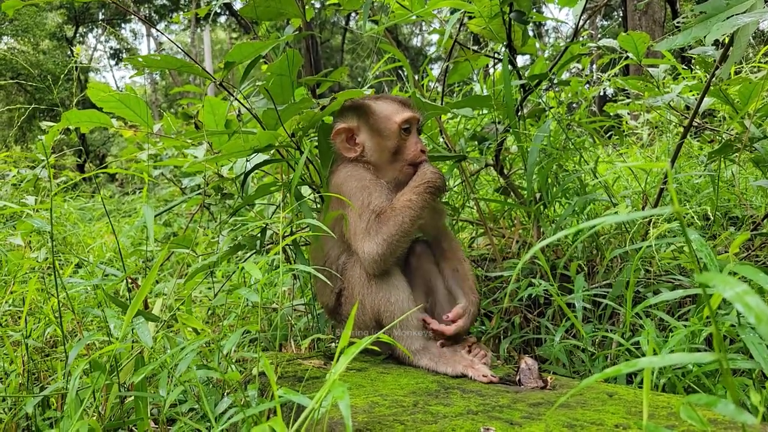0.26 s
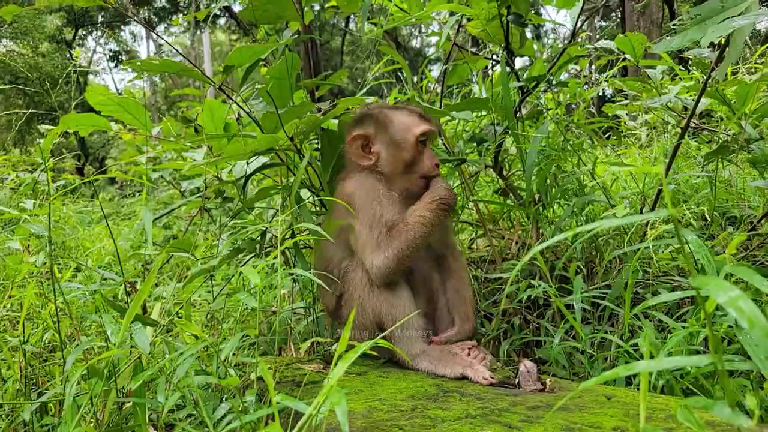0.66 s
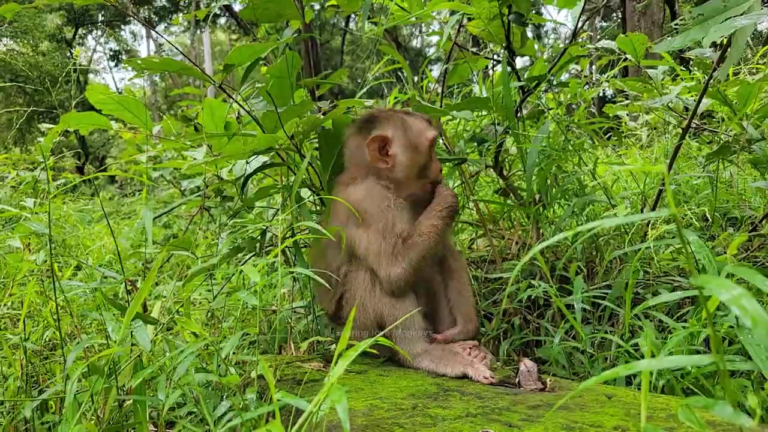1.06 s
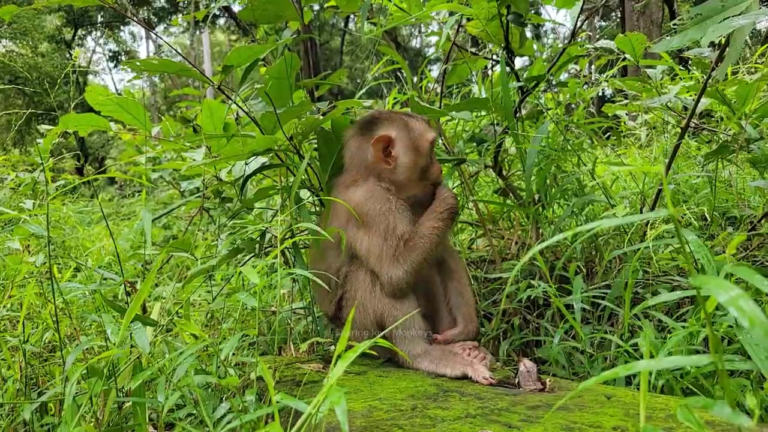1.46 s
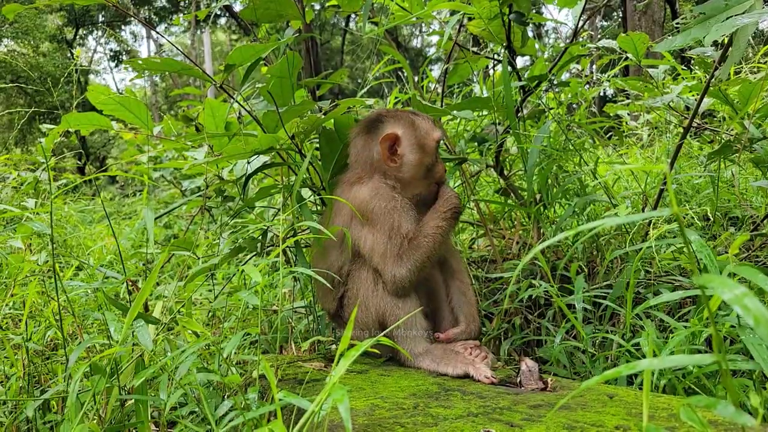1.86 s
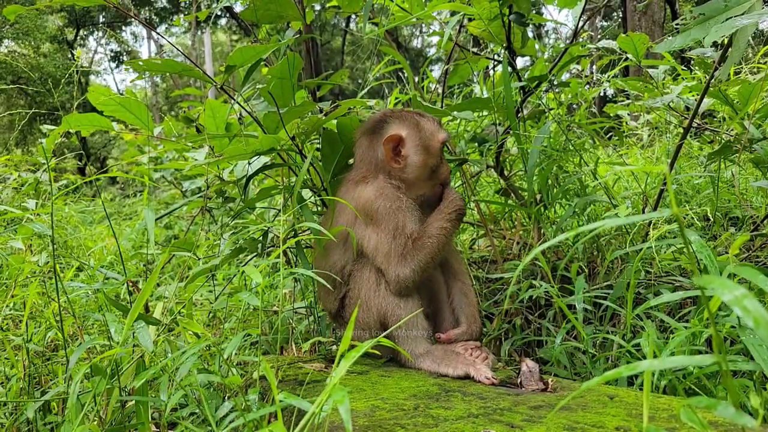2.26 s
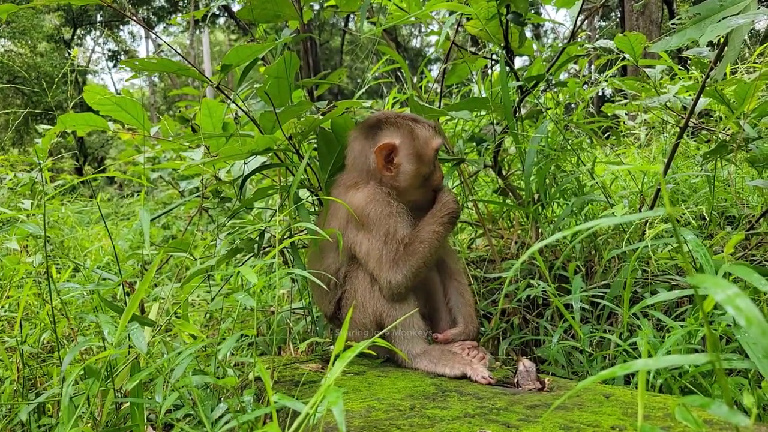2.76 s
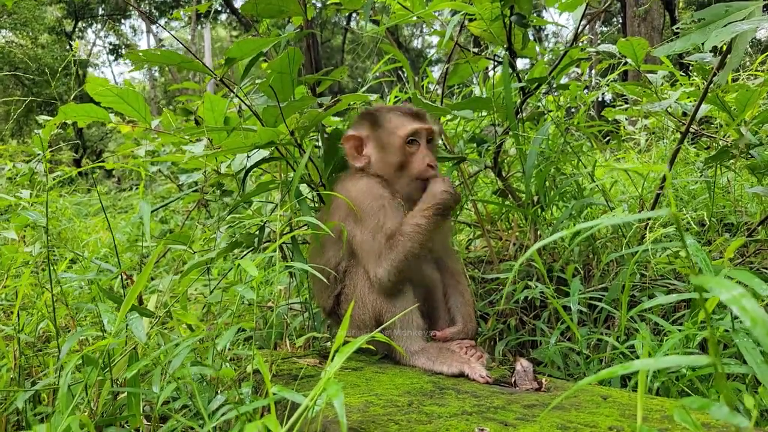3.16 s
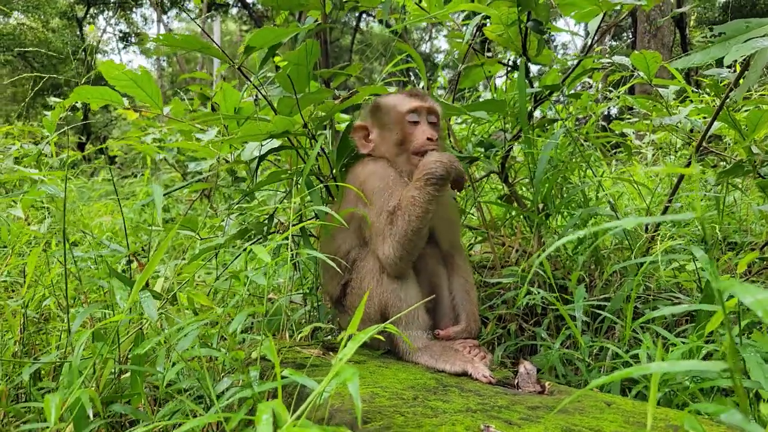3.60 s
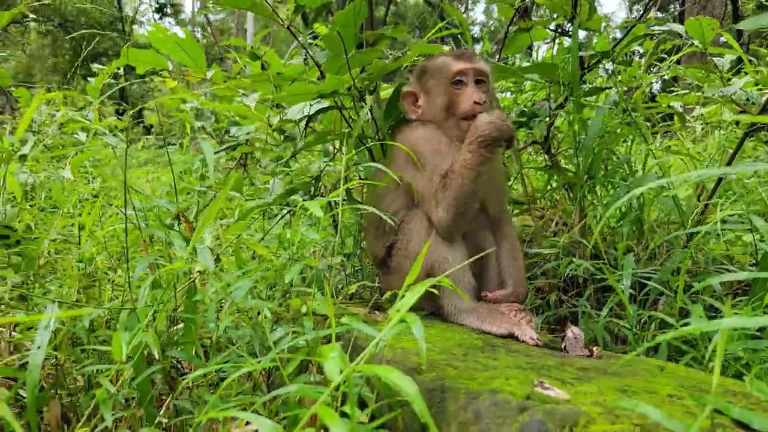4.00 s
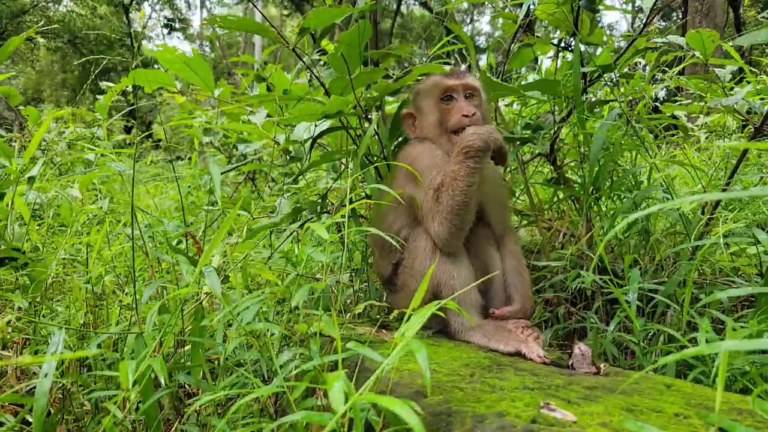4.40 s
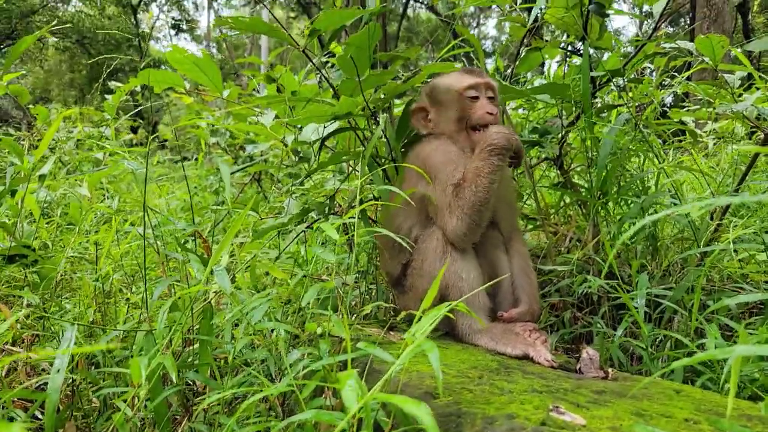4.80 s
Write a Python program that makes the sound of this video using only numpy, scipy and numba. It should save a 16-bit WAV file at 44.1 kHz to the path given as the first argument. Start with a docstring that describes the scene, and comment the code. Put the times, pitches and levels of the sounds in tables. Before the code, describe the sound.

Two gentle coos from a nearby young monkey turn into a quick run of sharp, raspy shrieks in a quiet forest with faintly hissing leaves.

```python
"""A forest: low rumble, a band of insects, a thin sinking whistle and now and then a faint far call.
Close by, a young monkey gives two whistled coos, its vocal folds swinging in an almost pure tone.
Leaves start to hiss and air rushes; a short yelp follows, then five harsh shrieks in which the folds
break from tone into rasp. The first shriek ends in a puff of air on the microphone, the second
in a tiny whimper, the fourth in a brief ringing echo; a new far whistle sinks away behind the last."""
import sys
import numpy as np
from scipy import signal
from scipy.fft import rfft, irfft, next_fast_len
from scipy.io import wavfile
from numba import njit

SR = 44100
rng = np.random.default_rng(int(sys.argv[2]) if len(sys.argv) > 2 else 0)


def materialize(psi):
    """Save the field psi as 16-bit PCM at rate SR to the path in sys.argv[1].

    A 1-D psi becomes a single channel; in a 2-D psi each row is a channel.
    """
    bounded = np.clip(np.atleast_2d(psi).T, -1, 1)
    quanta = np.round(bounded * 32767).astype(np.int16)
    wavfile.write(sys.argv[1], SR, quanta)


N = 222396
TIME = np.arange(N) / SR
TOP_HZ = 15900
SOFT_FADE_S, SHRIEK_FADE_S = 0.0098, 0.012


def monkey():
    """The near voice: two coos, a yelp, a whimper and five shrieks, three led in by a squeak."""
    # pitch lines of the soft calls: t/s, f/Hz
    arched_coo = [(0.136, 602), (0.176, 544.5), (.225, 729), (0.283, 1120), (0.33, 1261), (0.387, 1002),
                  (.42, 997), (0.479, 910), (0.585, 845)]
    level_coo = [(1.856, 946), (1.961, 903), (2.111, 932), (2.149, 925.7), (2.162, 971), (2.178, 864),
                 (2.201, 974), (2.214, 980), (2.232, 850)]
    yelp = [(3.287, 881), (3.308, 787.6), (3.327, 523), (3.342, 587.5), (3.357, 517)]
    whimper = [(3.916, 844), (3.934, 706)]
    # their voicing, in that order: peak t/s, level/dB, overtone offset/dB, overtone bloom/(dB per dB
    # of swell), rolloff at 920 Hz/(dB per harmonic), extra onset roughness, steady roughness
    voicings = [(.495, -27.5, -23.5, 0.51, -0.41, 0.53, 0.07),
                (2.037, -30.5, -27.5, 0.74, -0.49, 0.03, 0.03), (3.336, -40, -3, -4.18, -0.0786, 0.42, 0),
                (3.924, -39, -22, -0.5, -0.5, 0.3, 0.13)]
    # hard pushes: t/s, rise/s, fall/s, rasp/dB, hiss/dB, hiss burst/dB, mouth f/Hz, its glide/(oct/s),
    # its damping, low cut/Hz, pitch/Hz, its glide/(oct/s), tone/dB, tone peak after/s
    shrieks = [(3.553, 0.049, 0.022, -22, -44, 18, 2280, 20, 1, 780, 849, -0.5, -28.5, 0.032),
               (3.845, 0.023, 0.068, -28, -19.5, 0.5, 5480, -33, .45, 1620, 4210, -7, -38.5, 0.051),
               (4.136, .035, 0.077, -22, -34, -4, 1920, -4.5, 0.58, 702, 907, .5, -23.5, 0.049),
               (4.448, .051, 0.042, -19, -21.5, 9, 2970, -0.5, 0.27, 1103, 2848, 4, -17.5, 0.051),
               (4.753, 0.033, 0.045, -24.5, -32.5, 6.5, 2380, 1, 0.48, 705, 922.6, 1.14, -26.5, 0.043)]
    # lead-ins: t/s, length/s, start f/Hz, target f/Hz, glide/s, level/dB, octave/dB, peak after/s
    squeaks = [(3.53, 0.03, 8000, 4580, 0.015, -45.5, -63, 0.0077),
               (3.811, 0.044, 5700, 8120, .042, -29.5, -13.5, 0.038),
               (4.125, 0.051, 6886, 4890, .006, -37.5, -58.5, .016)]
    out = np.zeros(N)
    for pitch_line, voicing in zip([arched_coo, level_coo, yelp, whimper], voicings):
        add(out, *coo(pitch_line, voicing))
    for row in shrieks:
        add(out, *shriek(row))
    for row in squeaks:
        add(out, *squeak(row))
    return out


def coo(pitch_line, voicing, easy_hz=901, swell_db_per_s=39.5, effort_db_per_oct=50.5, flutter_db=3):
    """The folds sing purest at their easy pitch; strained above it or slack below, they grow overtones."""
    # overtone colour of the two mouth shapes: f/Hz, level/dB
    open_mouth = [(400, -28.5), (1100, 7.5), (1400, -15.5), (1750, 7), (2450, -11), (3100, -3.5), (3900, 1),
                  (4600, -16.5), (5400, -1), (6300, -29), (7800, -1.5), (8900, -20), (10600, -4.5),
                  (13500, -21)]
    pursed_lips = [(900, 14.5), (1850, -7), (2780, -15.5), (3700, -23), (4600, -15.5), (5550, -12),
                   (6500, -21.5), (7400, -23), (8300, -10), (9400, 1), (10200, -1.5), (11200, -31),
                   (14000, -14.5)]
    peak_s, level_db, bright_db, bloom, rolloff_db, onset_rough, steady_rough = voicing
    times, pitches = np.transpose(pitch_line)
    start, t, fade = span(times[0], times[-1] - times[0], SOFT_FADE_S)
    size, peak = len(t), max(peak_s - times[0], 1e-3)
    hz = np.interp(t + times[0], times, pitches)
    strain_oct = np.maximum(np.log2(hz / easy_hz), 0)
    slack_oct = np.maximum(np.log2(easy_hz / hz), 0)
    effort_oct = strain_oct + slack_oct
    rough = steady_rough + 0.21 * slack_oct + onset_rough * np.exp(-(t / 0.054) ** 2)

    swell_db = arch(t, peak, swell_db_per_s * peak, release_db=16.5)
    db = level_db + swell_db
    upper_db = db + np.minimum(bright_db + bloom * swell_db + effort_db_per_oct * effort_oct, -3.5)
    upper_db -= 6 * np.exp(-t / 0.029)  # overtones take a moment to build
    upper_db += 5 * np.minimum(rough, .6) * wander(240, size)  # rough folds beat unevenly
    jitter = (.001 + 0.034 * rough) * wander(1100, size)
    waver = 0.0055 * wander(160, size)
    phase = phase_of(hz * (1 + jitter + waver))

    dullness = (920 / hz) ** 3  # slack folds make duller overtones
    opening = np.minimum(effort_oct / 0.14, 1)  # the mouth opens away from the easy pitch
    overtones = np.zeros(size)
    for k in range(2, 20):
        mouth = gain_at(k * hz, open_mouth) ** opening * gain_at(k * hz, pursed_lips) ** (1 - opening)
        harmonic_db = dullness * rolloff_db * (k + 0.5) + flutter_db * wander(74.3, size)
        overtones += mouth * undb(harmonic_db) * np.sin(k * phase) * (k * hz < TOP_HZ)

    # rough folds let air through: a dull growl that brightens as they tighten
    air_hz = hz ** 2 / 260
    air = unit(resonate(resonate(noise(open_mouth, size), air_hz, 2.2), air_hz, 2.2))
    air *= 1.7 * rough * (1 + .7 * np.cos(phase))
    # strain thins the fundamental and adds a fine turbulent hiss
    fundamental = np.sin(phase) * undb(db - 5.5 * strain_oct + 4 * rough ** 2 * wander(360, size))
    hiss = noise([(1500, -14), (3500, -3), (6000, -7), (7800, 0), (11500, -2)], size)
    air += 0.338 * (hz / 1250) ** 5 * hiss
    upper = colour(undb(upper_db) * (np.sqrt(2) * overtones + air), [(11000, 0), (13500, -18)])
    return start, fade * (np.sqrt(2) * fundamental + upper)


def shriek(row, jitter=0.033, mouth_q=4.6, tremor_db=1.4, release_db=26, hiss_db_per_oct=12.5):
    """Tight folds slip between a tone and chaotic bursts that ring the mouth and upper throat."""
    # resonances that colour the hiss: f/Hz, level/dB
    upper_throat = [(2400, -34.5), (3500, -19), (4300, -27), (5600, -1), (6700, 4), (8000, -10.5),
                    (9700, -2.5), (11500, -7), (13800, -3), (16000, -19)]
    (s, rise, fall, rasp_peak_db, hiss_peak_db, burst_db, mouth_centre_hz, mouth_glide, damping,
     low_cut_hz, pitch_hz, glide, tone_peak_db, tone_peak_s) = row
    start, t, fade = span(s, rise + fall, SHRIEK_FADE_S)
    size = len(t)
    mouth_oct = mouth_glide * (t - rise)
    mouth_hz = mouth_centre_hz * 2 ** mouth_oct

    # one shaking push drives rasp and hiss
    rasp_db = rasp_peak_db + arch(t, rise, 19.5, release_db) + tremor_db * wander(90, size)
    hiss_db = hiss_peak_db + arch(t, rise, 11, release_db) + tremor_db * wander(90, size)
    hiss_db += burst_db * np.exp(-((t - SHRIEK_FADE_S) / 0.02) ** 2)  # opening burst
    hiss_db += hiss_db_per_oct * mouth_oct  # hiss rises and falls with the mouth resonance

    # the folds lock into a tone for a moment, carried by the harmonic nearest the mouth resonance
    tone_db = tone_peak_db - 10 * ((t - tone_peak_s) / .028) ** 2
    rough = 1 / (1 + undb(tone_db - rasp_db))
    hz = pitch_hz * 2 ** (glide * (t - rise)) * (1 + jitter * rough * wander(900, size))
    k = np.arange(1, 13)[:, None]
    detune = k * hz / mouth_hz - mouth_hz / (k * hz)
    weight = undb(0.5 * np.log2(k)) / np.hypot(1, mouth_q * detune) * (k * hz < TOP_HZ)
    weight /= np.sqrt((weight ** 2).sum(0) + 1e-12)
    tone = np.sqrt(2) * (weight * np.sin(k * phase_of(hz))).sum(0)

    bursts = np.tanh(wander(656, size))
    gate = unit(undb(4.2 * bursts))
    flow = rng.standard_normal(size) * gate
    ring = unit(resonate(resonate(flow, mouth_hz, 1. * damping), mouth_hz, 2. * damping) / mouth_hz ** .5)
    # chaotic cycles also spill energy below the resonance
    chest = unit(resonate(rng.standard_normal(size) * gate, mouth_hz * 0.54, 1.0) / mouth_hz ** .5)
    chest = colour(chest, [(150, -20), (350, 21.5), (1000, 3.5), (4000, 7), (10000, 4)])
    rasp = 2 * np.tanh(ring / 2) + undb(-14) * chest  # the swing of the folds is bounded
    hiss = noise(upper_throat, size) * gate
    harsh = colour(undb(rasp_db) * rasp + undb(hiss_db) * hiss, [(.5 * low_cut_hz, -19), (low_cut_hz, 0)])
    return start, fade * (undb(tone_db + rough * bursts) * tone + harsh)


def squeak(row, jitter=.02):
    """A very high whistle and its octave, gliding towards a resting pitch."""
    s, length, from_hz, to_hz, glide_s, db, octave_db, peak = row
    start, t, fade = span(s, length, SHRIEK_FADE_S)
    hz = to_hz + (from_hz - to_hz) * np.exp(-t / glide_s)
    phase = phase_of(hz * (1 + jitter * wander(810, len(t))))
    swell = undb(arch(t, peak, rise_db=29 * peak / length, release_db=1))
    tone = undb(db) * swell * np.sin(phase) + undb(octave_db) * swell ** 2 * np.sin(2 * phase)
    return start, fade * np.sqrt(2) * tone


def air_and_leaves():
    """A fluttering rush of air, hissing leaves, dull puffs on the microphone and a few dry ticks."""
    # colours of the rush and the leaf hiss: f/Hz, level/dB
    rush_colour = [(100, -10.5), (350, 6.5), (800, -5.5), (1500, -7), (2200, -9), (3600, -6.5), (4600, -9),
                   (6500, -20.5), (9500, -14.5), (15500, -16)]
    leaf_colour = [(2000, -24.5), (5000, -1), (8500, -11.5), (10000, -4.5), (11300, -6), (12600, 9.5),
                   (15000, -3), (16000, 7)]
    # their swells: peak t/s, level/dB, rise/s, fall/s
    gusts = [(2.99, -63.5, 0.037, 0.04), (3.31, -48.5, 0.046, .08), (3.58, -43, 0.11, 0.0334),
             (3.607, -24.5, 0.0068, 0.038), (3.79, -46, 0.036, 0.082)]
    rustles = [(2.76, -55, 0.03, 0.14), (3.0, -54.5, .12, 0.028), (3.32, -54, 0.11, 0.33),
               (3.8, -48, 0.31, 0.094), (4.42, -56.5, 0.53, 0.12), (4.85, -50, .1, 0.034),
               (5.03, -53.5, 0.06, 0.11)]
    # thumps of air: t/s, level/dB, decay/s, top f/Hz
    puffs = [(3.601, -17.5, 0.0054, 584), (3.619, -31, 0.01, 1330), (3.636, -19, 0.002, 956),
             (3.651, -29.5, 0.0036, 700), (3.669, -60, 0.0067, 700)]
    # small dry ticks: t/s, level/dB, f/Hz
    ticks = [(3.028, -39.5, 12500), (3.817, -45, 3530), (4.867, -43.5, 11800)]
    out = noise(rush_colour) * swells(gusts) * undb(2 * wander(120))
    out += noise(leaf_colour) * swells(rustles) * undb(0.53 * wander(40))
    t = TIME[:SR // 10]
    attack = np.minimum(t / 0.00092, 1)
    for s, db, decay, top_hz in puffs:
        thump = noise([(25, -6), (65, 9), (200, -3), (top_hz, -2), (4 * top_hz, -22), (15000, -40)], len(t))
        add(out, int(s * SR), undb(db) * thump * attack * np.exp(-t / decay))
    for s, db, hz in ticks:
        tick = unit(resonate(rng.standard_normal(len(t)), np.full(len(t), 1. * hz), 0.088))
        add(out, int(s * SR), undb(db) * tick * np.exp(-t / 0.0033))
    return out


def far_calls_and_echo(edge_db=9.5):
    """Long sinking whistles, faint far calls and a brief ringing echo of the fourth shriek's tone."""
    # sinking whistles: t/s, length/s, f/Hz, sink/(oct/s), level/dB, fade/(dB/s)
    whistles = [(0, 4.1, 2882, .225, -54.5, 10.5), (1.404, 1.9, 575, .06, -83.5, 10),
                (4.543, 0.79, 3110, 0.66, -66.5, 13)]
    # the echo (at 4.541 s) and the far calls: t/s, length/s, start f/Hz, end f/Hz, level/dB, octave/dB
    short_tones = [(.8, 0.33, 941, 1136, -68, -73), (1.268, 0.094, 1520, 1230, -67.5, -88),
                   (2.683, .13, 2140, 2320, -68, -96), (4.541, 0.053, 3040, 3130, -49.5, -79),
                   (4.919, 0.28, 1036, 1090, -60.5, -77.5)]
    out = np.zeros(N)
    for s, length, hz, sink, db, db_per_s in whistles:
        start, t, fade = span(s, length, SOFT_FADE_S)
        add(out, start, fade * smeared_tone(hz * 2 ** (-sink * t), db - db_per_s * t, octave_db=-np.inf))
    for s, length, from_hz, to_hz, db, octave_db in short_tones:
        start, t, fade = span(s, length, SOFT_FADE_S)
        swell = undb(arch(t, length / 2, edge_db, edge_db))
        add(out, start, fade * swell * smeared_tone(np.linspace(from_hz, to_hz, len(t)), db, octave_db))
    return out


def smeared_tone(hz, db, octave_db, flicker_db=2):
    """A thin tone and its octave, pitch and level smeared by the trees."""
    smear_hz = 60 * np.sqrt(1500 / hz) * wander(500, len(hz))
    phase = phase_of(hz + smear_hz)
    flicker = undb(flicker_db * wander(55, len(hz)))
    return flicker * (undb(db) * np.sin(phase) + undb(octave_db) * np.sin(2 * phase))


def forest(wash_db=-75, insect_db=-81, insect_hz=6750., left_boost_db=5.5):
    """The bed: a heaving rumble shared by both sides, a quiet wash and a steady band of insects."""
    # colours of the wash and the rumble: f/Hz, level/dB
    wash_colour = [(200, -3.5), (400, -2.5), (560, 4), (800, -3.5), (1300, -5.5), (2100, -5), (3200, -6.5),
                   (4300, -13), (4900, -7.5), (5700, -26), (8500, -29.5), (11200, -13), (12800, -21)]
    rumble_colour = [(20, -24.5), (35, -15.5), (50, -2.5), (78, 2.5), (110, -2), (150, -10.5), (200, -22.5),
                     (300, -32), (500, -56), (1500, -90.5)]
    # heave of the rumble: t/s, level/dB
    rumble_level = [(0.0, -53.5), (1.66, -54), (1.9, -63), (2.6, -47.5), (2.86, -58.5), (3.51, -57.5),
                    (3.61, -41.5), (3.82, -55.5), (5.04, -51)]
    rumble = noise(rumble_colour) * undb(np.interp(TIME, *np.transpose(rumble_level)))
    out = np.outer(undb([left_boost_db, 0]), rumble)
    centre = np.full(N, insect_hz)
    for side in out:
        insects = unit(resonate(resonate(rng.standard_normal(N), centre, .12), centre, .12))
        side += insects * undb(insect_db + wander(38))
        side += noise(wash_colour) * undb(wash_db + wander(0.9))
        side += undb(-65.5) * noise(rumble_colour)  # a faint steady rumble of its own
    return out


def trees(x, near_db=-17, far_db=-40, near_t60=.12, far_t60=0.17):
    """Stereo reverb: quick scatter from nearby leaves and a faint dull tail from the trunks."""
    t = TIME[:SR]
    sides = []
    for _ in range(2):
        near = noise([(400, -8), (2000, 0), (14000, -3)], SR) * undb(-60 * t / near_t60)
        far = noise([(300, -6), (1000, 0), (3000, -2), (12000, -22)], SR) * undb(-60 * t / far_t60)
        response = (undb(near_db) * unit(near) + undb(far_db) * unit(far)) / np.sqrt(SR)
        sides.append(signal.fftconvolve(x, response)[:N])
    return np.array(sides)


def microphones(x, lag_rad=1.93, lag_hz=1600, scatter=0.063):
    """The left microphone hears x directly; the right later and shaded, with scatter from the grass."""
    # shading on the right: f/Hz, level/dB
    shading = [(100, -6), (350, -13), (800, -4.5), (1250, -2.5), (2400, -6), (4400, -8), (8000, -9),
               (15000, -9)]
    hz = np.fft.rfftfreq(N, 1 / SR)
    lag = np.exp(-1j * lag_rad * np.tanh(hz / lag_hz))
    right = irfft(rfft(x) * gain_at(hz, shading) * lag, N)
    t = TIME[:SR // 20]
    grass = scatter * unit(noise([(700, -12), (2500, 0)], len(t)) * np.exp(-t / .01)) / np.sqrt(len(t))
    return np.array([x, right + signal.fftconvolve(x, grass)[:N]])


def span(s, length, fade_s):
    """Start sample, local time and edge fades of one sound."""
    t = TIME[:int(length * SR)]
    edge = np.clip(np.minimum(t, t[-1] - t) / fade_s, 0, 1)
    return max(int(s * SR), 0), t, np.sin(np.pi / 2 * edge) ** 2


def arch(t, peak, rise_db, release_db):
    """Level in dB of one swell: a steady climb to the peak, then an ever faster fall."""
    before = np.maximum(1 - t / peak, 0)
    after = np.maximum(t - peak, 0) / max(t[-1] - peak, 1e-3)
    return -rise_db * before - release_db * after ** 2


def swells(rows):
    """Gain of overlapping swells that grow and die away exponentially."""
    gains = [undb(db) * np.exp(np.minimum((TIME - s) / rise, (s - TIME) / fall))
             for s, db, rise, fall in rows]
    return np.sqrt(sum(gain ** 2 for gain in gains))


def undb(db):
    """Decibels to gain."""
    return 10 ** (np.asarray(db) / 20)


def unit(x):
    """Scale to rms 1."""
    return x / np.sqrt(np.mean(x ** 2) + 1e-20)


def phase_of(hz):
    """Running phase of a moving pitch, in radians."""
    return 2 * np.pi * np.cumsum(hz) / SR


def gain_at(hz, points):
    """Gain of an EQ curve (f/Hz, level/dB) at the given frequencies."""
    f, db = np.transpose(points)
    return undb(np.interp(np.log(hz + 1), np.log(f), db))


def colour(x, points):
    """Filter by an EQ curve (f/Hz, level/dB)."""
    size = next_fast_len(len(x) + 512)
    return irfft(rfft(x, size) * gain_at(np.fft.rfftfreq(size, 1 / SR), points), size)[:len(x)]


def noise(points, size=N):
    """Coloured noise of rms 1."""
    return unit(colour(rng.standard_normal(size), points))


def wander(rate, size=N):
    """Random values, rate a second, joined by lines; spread near 1."""
    at = np.arange(size) * rate / SR
    return 1.42 * np.interp(at, np.arange(size), rng.standard_normal(size))


def add(track, start, x):
    """Mix x into the track from a start sample."""
    track[start:start + len(x)] += x[:N - start]


@njit
def resonate(x, hz, damping):
    """State-variable band-pass with a moving centre; damping = width / centre."""
    y, band, low = np.empty(len(x)), 0., 0.
    for i in range(len(x)):
        g = np.tan(np.pi * min(hz[i], .42 * SR) / SR)
        v = (band + g * (x[i] - low)) / (1 + g * (g + damping))
        band, low, y[i] = 2 * v - band, low + 2 * g * v, damping * v
    return y


def scene():
    """The monkey a little to the left, in its forest."""
    voice = monkey()
    return microphones(voice + air_and_leaves() + far_calls_and_echo()) + trees(voice) + forest()


def record(dry):
    """Round the loudest peaks and cut the top."""
    rounded = .6 * np.tanh(dry / .6)
    return signal.sosfilt(signal.ellip(10, .2, 80, TOP_HZ, fs=SR, output="sos"), rounded)


dry = scene()
out = record(dry)
materialize(out)
```